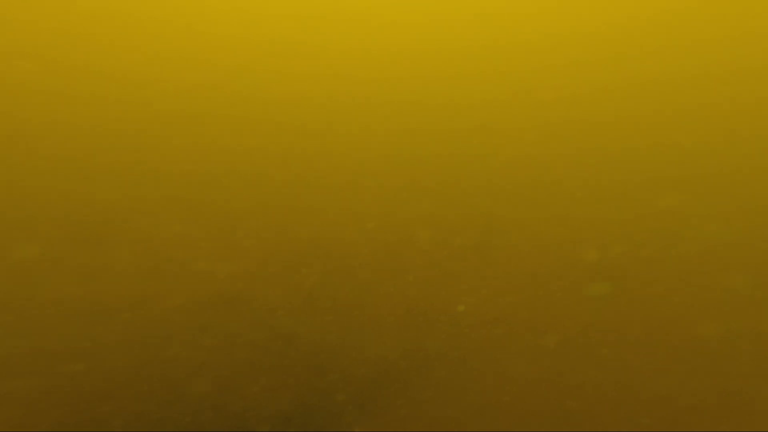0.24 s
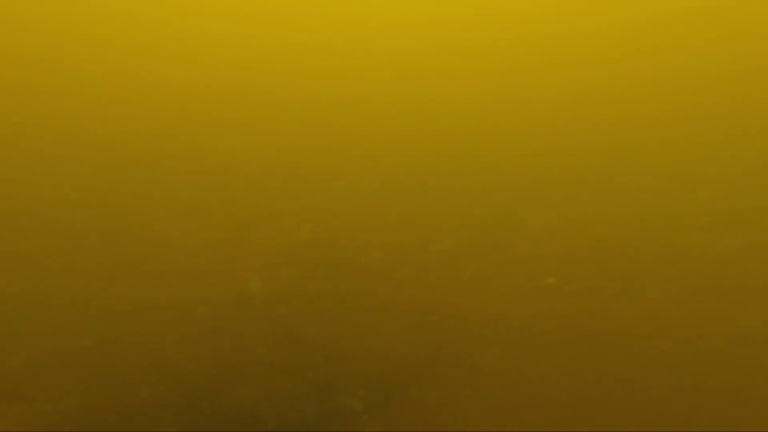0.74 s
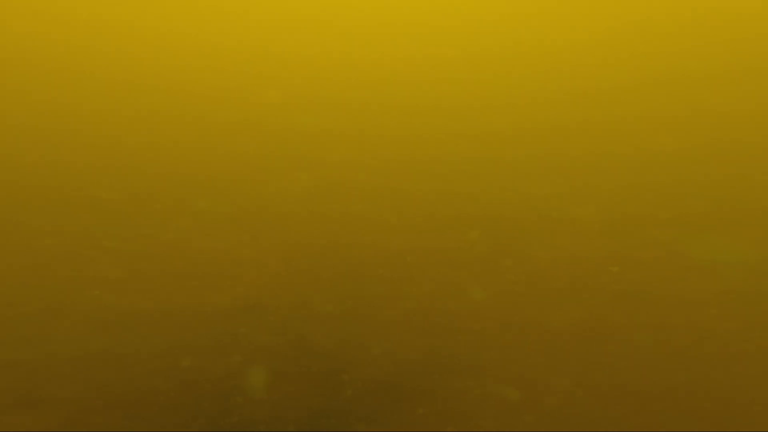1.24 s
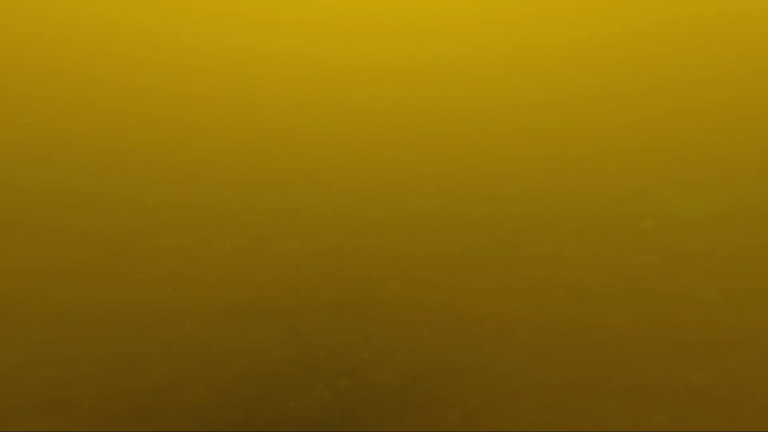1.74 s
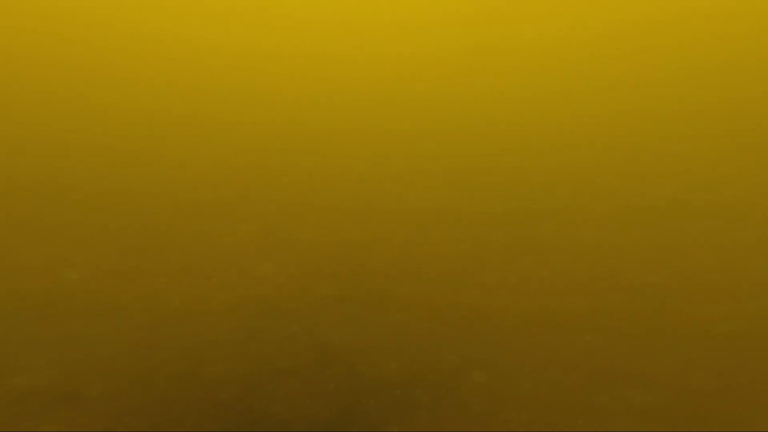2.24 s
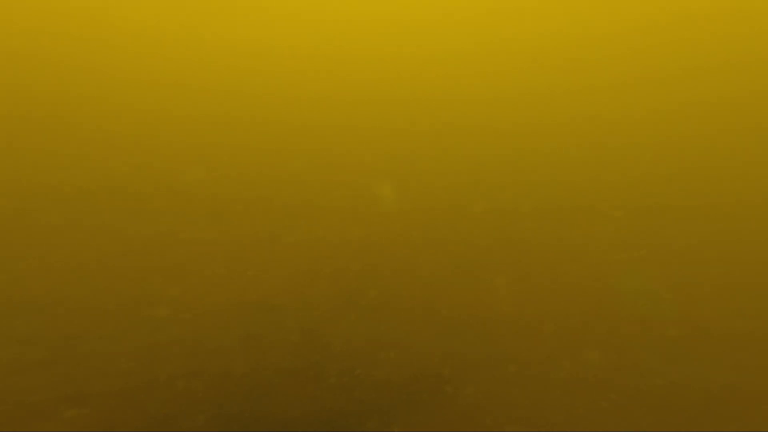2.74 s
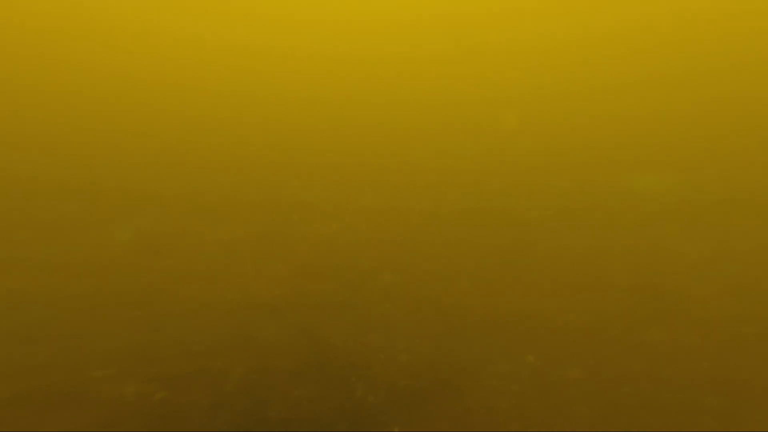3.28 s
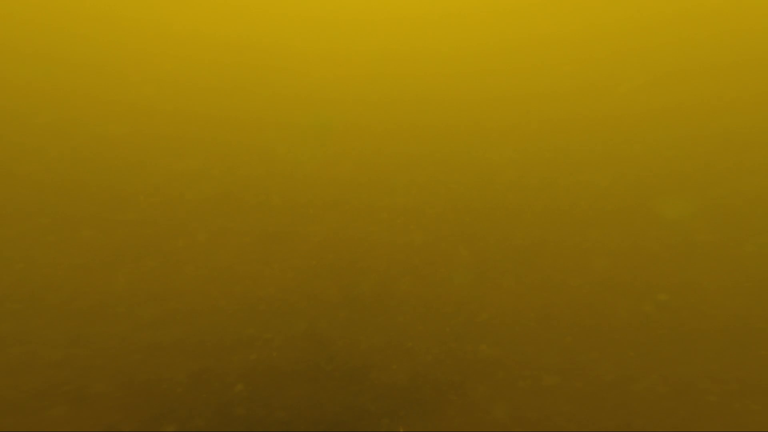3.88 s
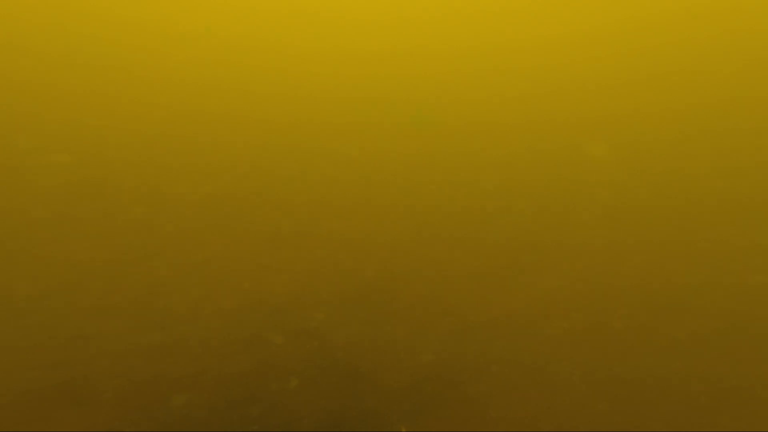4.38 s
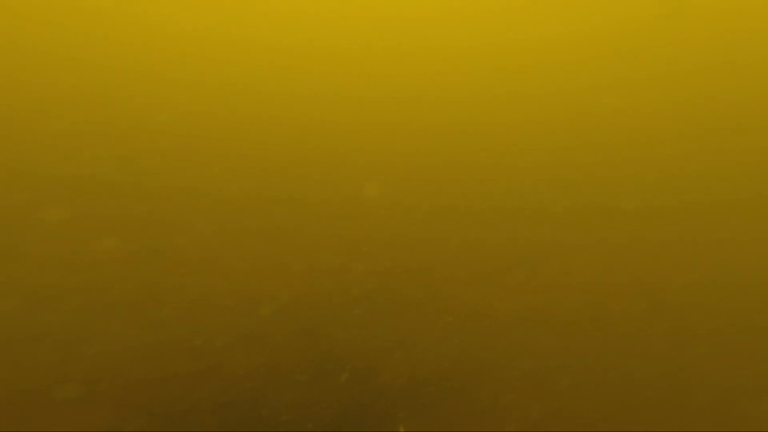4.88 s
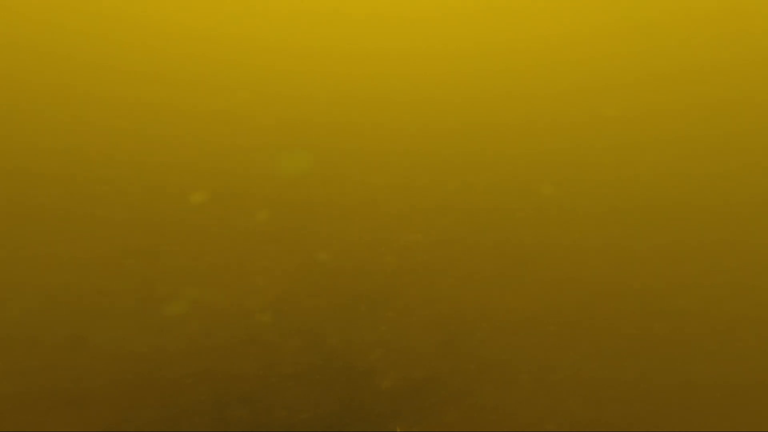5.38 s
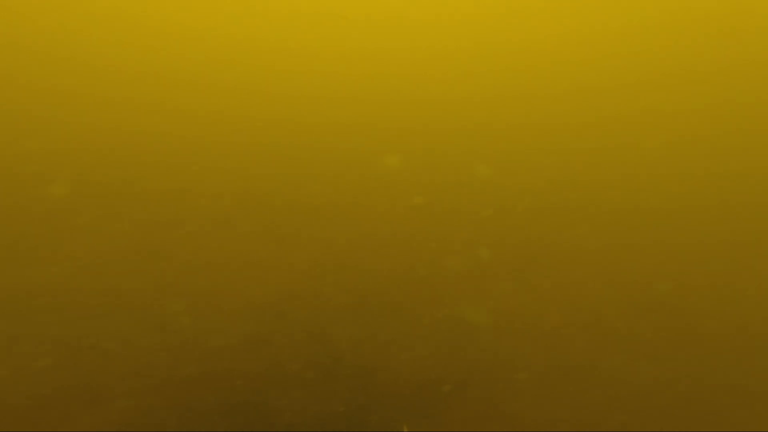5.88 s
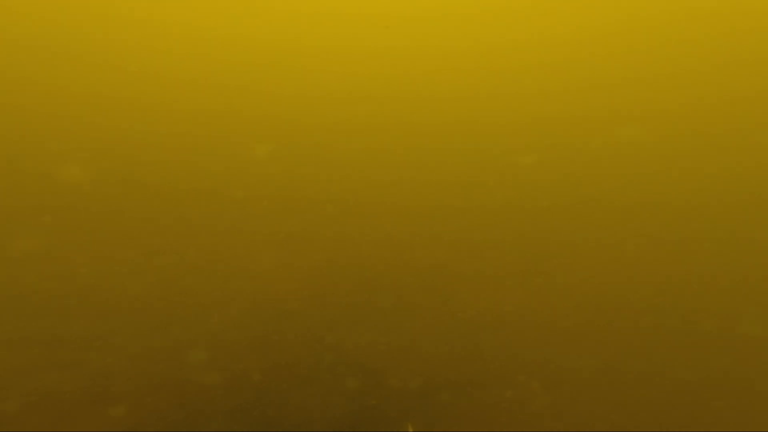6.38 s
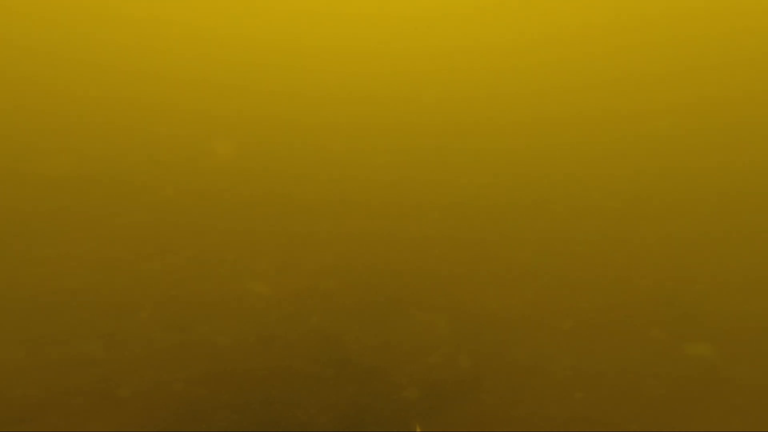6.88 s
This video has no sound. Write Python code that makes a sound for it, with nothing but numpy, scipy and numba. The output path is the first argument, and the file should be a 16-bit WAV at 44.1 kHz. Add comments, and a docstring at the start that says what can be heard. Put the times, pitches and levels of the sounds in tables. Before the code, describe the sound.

Underwater in a murky river, a motorboat's crackling whine speeds up and draws nearer over low current rumble, gurgles and dull housing bumps.

```python
"""A motor boat whines and crackles under water, speeding up and coming closer over the rumble of a murky river.
Two microphones sit in a waterproof camera housing; each propeller blade sheds a burst of collapsing bubbles
that rings the housing as a whine. The current rumbles past and slow eddies gurgle close by.
The housing is bumped on its mount, scraped and once struck so sharply that the limiter ducks."""
import sys
import numpy as np
from scipy import signal
from scipy.fft import rfft, irfft
from scipy.io import wavfile
from scipy.ndimage import uniform_filter1d, minimum_filter1d, map_coordinates
from numba import njit

SR = 44100
rng = np.random.default_rng(int(sys.argv[2]) if len(sys.argv) > 2 else 0)


def unload_audio(sound):
    """Save the sound as a 16-bit wav file, at the path given as the first command line argument."""
    columns = np.transpose(np.atleast_2d(sound))
    # keep every value between -1 and 1, then stretch to whole-number steps
    steps = np.round(np.clip(columns, -1, 1) * 32767)
    wavfile.write(sys.argv[1], SR, steps.astype(np.int16))


N = 313992
TIME = np.arange(N) / SR  # s
FREQ = np.maximum(np.arange(N // 2 + 1) * SR / N, .01)  # Hz, kept above 0 for the logarithm

# Propeller blade passes: [t/s, f/Hz]
BLADE_RATE = [(0, 33.2), (3.8, 33.39), (4.3, 42.2), (4.9, 44.37), (6.0, 44.44), (7.1, 43.82)]
# Strength of the cavitation as it reaches the camera: [t/s, level/dB]
CAVITATION_LEVEL = [(0, -1.44), (2.2, -0.1), (2.55, -4), (3.85, -2.5), (4.3, 2), (4.95, -0.5), (5.9, 3.5),
                    (7.1, 7.5)]
# Throttle: [t/s, load 0-1]
THROTTLE = [(0, 0), (3.8, 0.33), (4.3, 0.6), (5.4, 0.7), (5.9, 0.91), (7.1, 0.99)]
# Ringing of the bubble cloud behind the propeller: [t/s, lower resonance f/Hz, upper resonance f/Hz]
CLOUD_RESONANCES = [(4.2, 3700, 5980), (5.7, 3560, 5700), (6.5, 3330, 5720), (7.1, 3220, 5430)]
# Brief swells of the whine: [t/s, rise level/dB, half length to 1/e t/s]
WHINE_SWELLS = [(4.47, 2.5, 0.19), (5.85, 3.5, 0.12), (6.7, 4.5, 0.088)]
# Extra travel time of the reflection from the water surface: [t/s, delay t/s]
SURFACE_DELAY = [(0, 0.005195), (4.6, 0.0046), (5.6, 0.00304), (7.1, 0.0023)]
# Housing modes: [f/Hz, width f/Hz, signed gain at the left microphone, at the right microphone]
HOUSING_MODES = [(880, 65, 0.0077, 0.6052), (1118, 91, 0.072, 0.5), (1340, 3640, -0.052, -0.024),
                 (1592.6, 356.3, 1.086, 3), (1591, 95.2, -0.66, -4), (1757.3, 261, -0.38, -2),
                 (2019, 153, -0.26, -0.41), (2138, 98, -0.33, -0.45), (2270, 42, -0.16, 0.34),
                 (2400, 120, -0.2, 0.13), (2920, 130, -0.194, 0.1569), (3194, 158, 0.5, 0.0455),
                 (4022, 347, 0.299, -0.13), (4380, 1410, -0.17, -0.0344), (4905, 313.0, 0.36, 0.0963),
                 (5440, 500, 0.099, 0), (5910, 810, 0.047, -0.0), (6290, 1300, 0.047, -0.0),
                 (7013, 330, -0.164, 0.03), (8970, 450, -0.12, 0.0354)]
# Modes of the camera on its mount: [f/Hz, time to fall 60 dB t/s, level/dB]
MOUNT_MODES = [(105, 0.073, -2.5), (162, 0.049, 0), (217, 0.067, -9), (278, 0.027, -8.5), (330, 0.027, -9),
               (470, 0.02, -4)]
# Single bumps, peaks before the wall colours them: [t/s, peak level/dB, hardness of the contact f/Hz]
SINGLE_BUMPS = [(.25, -37, 257), (.485, -31, 121), (0.761, -15.5, 151), (1.49, -31.5, 81.3),
                (4.578, -7.5, 216), (4.604, -7, 185), (4.705, -22, 90), (5.292, -16.5, 155.5),
                (5.472, -15, 155), (6.182, -30, 110), (6.35, -34.5, 220.3), (6.507, -12.5, 147)]
# Double thuds, the mount pulled over and falling back; levels before wall and pan:
# [t/s, time to the second thud t/s, peak level/dB, hardness of the contact f/Hz, swing level/dB]
DOUBLE_THUDS = [(1.18, 0.13, -24.5, 83, -26), (1.746, .099, -34.5, 115, -35), (2.061, .112, -23.5, 88, -35),
                (2.306, 0.12, -12, 100.4, -14), (3.473, 0.12, -31.5, 125, -26),
                (4.03, 0.13, -24, 105, -22.5), (4.353, .127, -24, 113, -29), (4.963, 0.13, -15, 89, -15),
                (5.868, 0.13, -20, 69.4, -34)]
# Eddies rock the whole camera, levels before the pan: [t/s, peak level/dB, swing rate f/Hz]
EDDY_SWAYS = [(1.263, -18, 27.1), (1.49, -26, 42.7), (3.131, -17, 28), (3.97, -23.5, 30)]
# Grit striking the housing, levels before the pan: [t/s, peak level/dB, pitch f/Hz]
GRIT_TICKS = [(.236, -38, 700), (4.235, -32, 680), (4.333, -43, 525), (4.478, -27, 1150), (4.573, -24, 800),
              (4.658, -19, 1410), (4.685, -22, 1490), (4.76, -28.5, 1700)]
# Bubbles ringing close to the housing, levels before the pan: [t/s, peak level/dB, pitch f/Hz]
NEAR_BUBBLES = [(1.105, -30.5, 2250), (1.11, -39, 2540), (1.113, -43, 3400), (4.591, -20.5, 1110),
                (6.02, -44, 602)]
# What the sharp strike rings, levels before the pan: [delay t/s, peak level/dB, pitch f/Hz, decay t/s]
STRIKE_RINGS = [(0, -14.5, 424, 0.0007), (.0013, 8.5, 1177, 0.00057), (.0015, -1.5, 1150, 0.0013)]
# The housing drags over something rough; slips vary around their rate, the level is trimmed and wavers:
# [t/s, level/dB, slip rate f/Hz]
SCRAPE_COURSE = [(4.565, -75, 260.4), (4.578, -26, 260.2), (4.61, -26.5, 229.7), (4.655, -26, 209.7),
                 (4.69, -31, 184.7), (4.72, -36, 158.6), (4.75, -80, 152)]
# Outline of the scrape's spectrum, relative: [f/Hz, level per Hz/dB]
SCRAPE_OUTLINE = [(80, -19), (190, 4), (430, -1.5), (650, -15.5), (1100, -12), (1600, -9.5), (2200, -25.5),
                  (3000, -28), (3800, -49), (9000, -81)]
# Outline of the current's rumble, relative: [f/Hz, level per Hz/dB]
RUMBLE_OUTLINE = [(8, -16), (18, -1.5), (29, 1.5), (45, -5.5), (65, -13.5), (90, -23), (200, -38),
                  (500, -72.5), (2000, -115)]

# the crackle follows the cavitation strength fully, the whine by a share of it and by the load
CRACKLE_DB, WHINE_DB, WHINE_SHARE, WHINE_LOAD_DB, WHINE_WAVER_DB = -48, -40.5, 0.6, 3.5, 0.78
# crackle scattered by the river bed: gain before its filters, left minus right
SCATTER_DB, SCATTER_PAN_DB = -37.5, -5.5
# dip just above the cloud's lower resonance: ratio to that resonance, width, depth 0-1 at full load
CLOUD_GAP_RATIO, CLOUD_GAP_HZ, CLOUD_GAP_DEPTH = 1.132, 520.0, 0.7
# each thud of a pair starts with a lighter touch and then swings the camera
TOUCH_LEAD_S, TOUCH_DB, SWING_HZ, SWING_LAG_S = 0.01577, -9.5, 60.3, 0.0041
# decay time constants in cycles of the pitch, and place as left minus right
TICK_CYCLES, BUBBLE_CYCLES, TICK_PAN_DB, BUBBLE_PAN_DB = 0.45, 2.9, -11, -9
STRIKE_S, STRIKE_PAN_DB = 4.0823, -9.5
# rumble that wanders, and slosh that rises with the load
RUMBLE_DB, RUMBLE_WANDER_DB, SLOSH_DB, SLOSH_LOAD_DB = -31.7, 2.5, -51.5, 2.5
# water stirred by a knock: level for a 0 dB knock, share of the knock's dB, half length to 1/e
STIR_DB, STIR_SHARE, STIR_S = -37, 0.29, 0.074
TRICKLE_RING_HZ, TRICKLE_WIDTH_HZ, TRICKLE_RING_DB = 330.5, 53.0, 2.5
TOP_HZ = 12000


def propeller(blade_hz):
    """Cavitation: separate bursts at low speed merge into a rush under load, heard through the housing."""
    strength_db, = curves(CAVITATION_LEVEL)
    load, = curves(THROTTLE)
    swell_db = sum(db * hump(s, half_s) for s, db, half_s in WHINE_SWELLS)
    swell_db = swell_db + WHINE_WAVER_DB * walk(8)
    whine_db = WHINE_DB + WHINE_SHARE * strength_db + WHINE_LOAD_DB * load + swell_db
    bursts = collapses(blade_hz, jitter_s=.0007, spread_db=2.5, stray_rate=150, stray_db=-4.0, decay_s=0.0021)

    # big bubbles ring on between the blades, small ones only crackle as they collapse
    big = rng.standard_normal(N) * np.sqrt(bursts + undb(6.5 - 3 * load))
    small = rng.standard_normal(N) * np.sqrt(bursts + undb(-10.5 + 11 * load))
    small = bubble_cloud(small, load)

    # the loaded drive whines in two bands, the upper one wavering
    low_band = resonate(big, np.full(N, 860.), 200.)
    high_band = resonate(big, 1490 + 35 * walk(6.7), 90.)
    big = big + load * (undb(2.5) * low_band + undb(-1.0) * high_band)
    big = cut(cut(big, 774, "high", order=7), 2500, "low", order=6)
    whine = steady(housing(surface(big, gain=0.093)))

    small = cut(cut(small, 2430, "high", order=4), 7350, "low", order=13)
    # unrelated at the two microphones
    scattered = rng.standard_normal((2, N)) * np.sqrt(bursts + undb(-13.5 + 13 * load))
    scattered = cut(cut(scattered, 4500, "high", order=4), 6400, "low", order=8)
    scattered = pan(scattered, SCATTER_PAN_DB) * undb(SCATTER_DB)
    # a little of the crackle passes straight through the wall
    through_wall = np.outer([.012, .012], small)
    crackle = steady(housing(small) + through_wall + scattered)
    return whine * undb(whine_db) + crackle * undb(CRACKLE_DB + strength_db)


def collapses(blade_hz, jitter_s, spread_db, stray_rate, stray_db, decay_s):
    """Power envelope of the bubble bursts, mean 1: one per blade, uneven, and strays in between."""
    starts = np.flatnonzero(np.diff(np.floor(np.cumsum(blade_hz) / SR)))
    chance = rng.standard_normal((400, 2))[:len(starts)]
    strays = rng.random(N) < stray_rate / SR
    power = strays * undb(stray_db + spread_db * np.clip(rng.standard_normal(N), -2, 2)) ** 2
    at = np.clip(starts + (jitter_s * SR * chance[:, 0]).astype(int), 0, N - 1)
    power[at] += undb(spread_db * np.clip(chance[:, 1], -2, 2)) ** 2
    # echoes between bed and surface draw each burst out
    power = signal.lfilter([1], [1, -np.exp(-1 / (decay_s * SR))], power)
    return power / power.mean()


def bubble_cloud(x, load):
    """The cloud grows under load: it swallows a band near the top and rings at two sinking resonances."""
    lower_hz, upper_hz = curves(CLOUD_RESONANCES)
    x = x - load * resonate(x, np.full(N, 6900.), 800.)
    lower_ring = undb(5.0) * resonate(x, lower_hz, 250.0)
    upper_ring = undb(7.5) * resonate(x, upper_hz, 400.0)
    x = x + load * (lower_ring + upper_ring)
    return x - CLOUD_GAP_DEPTH * load * resonate(x, CLOUD_GAP_RATIO * lower_hz, CLOUD_GAP_HZ)


def surface(x, gain):
    """The surface mirrors the sound upside down; the comb rises as the delay shrinks."""
    delay_s, = curves(SURFACE_DELAY)
    return x - gain * map_coordinates(x, [(TIME - delay_s) * SR], order=3)


def housing(x):
    """Every mode of the shell reaches the two microphones with its own strength and sign."""
    out = np.zeros((2, N))
    for hz, width, left, right in HOUSING_MODES:
        mode = signal.lfilter(*signal.iirpeak(hz, hz / width, fs=SR), x)
        out += np.outer([left, right], mode)
    return out


def bumps():
    """Soft pushes ring the mount; a harder contact reaches its higher modes."""
    t = TIME[:SR // 4]
    ring = sum(undb(db) * np.cos(2 * np.pi * hz * t) * np.exp(-np.log(1000) * t / t60)
               for hz, t60, db in MOUNT_MODES)
    out, lead = np.zeros(N), .05  # lead in s leaves room for the push to build
    pulls = [(s, db, hz) for s, db, hz, _ in thuds()]
    touches = [(s - TOUCH_LEAD_S, db + TOUCH_DB, hz) for s, db, hz in pulls]
    for s, db, hz in list(SINGLE_BUMPS) + pulls + touches:
        u = (np.pi * hz * (t - lead)) ** 2
        push = (1 - 2 * u) * np.exp(-u)
        # the mount has play: it catches a second time just after the first touch
        push = push + 0.74 * np.interp(t - min(.0068, 1.12 / hz), t, push)
        hit = signal.fftconvolve(push, ring)[:len(t)]
        add(out, s - lead, hit / np.abs(hit).max() * undb(db))
    return wall(out)


def thuds():
    """Both thuds of every pair: (s, peak dB, hardness Hz, swing dB)."""
    return [(at, db, hz, swing_db)
            for s, gap_s, db, hz, swing_db in DOUBLE_THUDS for at in (s, s + gap_s)]


def sways():
    """An eddy or a tug swings the camera through a cycle or two against the water."""
    out, t = np.zeros(N), TIME[:SR // 4]
    swings = [(s + SWING_LAG_S, swing_db, SWING_HZ) for s, _, _, swing_db in thuds()]
    for s, db, hz in list(EDDY_SWAYS) + swings:
        cycles = hz * (t - t.mean())
        swing = np.cos(2 * np.pi * cycles) * np.exp(-((cycles - .2) / 1.18) ** 2)
        add(out, s - t.mean(), undb(db) * swing)
    return pan(out, -4.5)


def ticks():
    """Grit, nearby bubbles and the sharp strike; lower grit and bubble pitches ring for longer."""
    out = np.zeros((2, N))
    for s, db, hz in GRIT_TICKS:
        add(out, s, pan(ping(db, hz, TICK_CYCLES / hz), TICK_PAN_DB))
    for s, db, hz in NEAR_BUBBLES:
        add(out, s, pan(ping(db, hz, BUBBLE_CYCLES / hz), BUBBLE_PAN_DB))
    for delay_s, db, hz, decay_s in STRIKE_RINGS:
        add(out, STRIKE_S + delay_s, pan(ping(db, hz, decay_s), STRIKE_PAN_DB))
    return out


def ping(db, hz, decay_s):
    """A short ring that rides on a dent of the wall."""
    t = TIME[:SR // 8]
    envelope = (t / decay_s) ** 2 * np.exp(-t / decay_s)
    ring = envelope * (np.sin(2 * np.pi * hz * t) + 0.3)
    return ring / np.abs(ring).max() * undb(db)


def scrape():
    """Uneven stick-slip pulses with a gritty noise between them."""
    db, slip_hz = curves(SCRAPE_COURSE)
    phase = np.cumsum(slip_hz * np.exp(.25 * walk(200))) / SR
    slips = np.diff(np.floor(phase), prepend=0) * undb(3.3 * walk(250))
    rough = colour(unit(slips) + .8 * rng.standard_normal(N), SCRAPE_OUTLINE)
    return wall(rough * undb(db - 1.5 + 2.5 * walk(110)))


def current(blade_hz):
    """Water buffets the housing; the loaded propeller adds a deep throb at its blade rate."""
    load, = curves(THROTTLE)
    churn = np.sqrt(undb(SLOSH_DB + SLOSH_LOAD_DB * load) ** 2 + stir())
    rumble = colour(rng.standard_normal(N), RUMBLE_OUTLINE) * undb(RUMBLE_DB + RUMBLE_WANDER_DB * walk(7))
    slosh = gurgles(rate=70, pitch_hz=134.5, spread_db=5, tilt_db=-10) * churn
    trickle = gurgles(rate=90, pitch_hz=301.4, spread_db=6.5, tilt_db=-12.5) * churn * undb(-16)
    # the trickle rings the mount
    mount_ring = resonate(trickle, np.full(N, TRICKLE_RING_HZ), TRICKLE_WIDTH_HZ)
    trickle = trickle + undb(TRICKLE_RING_DB) * mount_ring
    throb = np.sin(2 * np.pi * np.cumsum(blade_hz) / SR) * undb(-45.5 + 13.8 * load + 2 * walk(4.6))
    return wall(rumble + throb + slosh + trickle)


def gurgles(rate, pitch_hz, spread_db, tilt_db):
    """Eddies and air pockets wobble for a cycle or two, gliding a little; higher ones are weaker."""
    out, t = np.zeros(N), TIME[:SR // 10]
    t = t - t.mean()
    starts = np.cumsum(rng.exponential(1 / rate, size=900))
    for s, (pitch, size, glide, turn) in zip(starts, rng.standard_normal((900, 4))):
        if s < TIME[-1]:
            octaves = np.clip(.7 * pitch, -1.1, 1.9)
            cycles = pitch_hz * 2 ** octaves * t
            wobble = np.sin(2 * np.pi * cycles * (1 + 0.087 * glide * cycles) + np.pi * turn)
            wobble = wobble * np.exp(-(cycles / 1.2) ** 2)
            level_db = spread_db * np.clip(size, -2, 2) + tilt_db * max(octaves, 0)
            add(out, s, wobble * undb(level_db))
    return unit(out)


def stir():
    """Power of the water stirred up around each knock."""
    return sum(undb(STIR_DB + STIR_SHARE * db) ** 2 * hump(s, STIR_S)
               for s, db, *_ in thuds() + list(SINGLE_BUMPS))


def wall(x):
    """Low sounds bend the whole wall: the right microphone feels them more, and more so as the pitch rises."""
    return pan(x, -4.5) + np.outer([-.2, .9], cut(x, 480, "high", order=1))


@njit
def resonate(x, hz, width):
    """State-variable band-pass with a moving centre, gain 1 there; width in Hz."""
    y, band, low = np.empty(len(x)), 0., 0.
    for i in range(len(x)):
        g, damping = np.tan(np.pi * hz[i] / SR), width / hz[i]
        v = (band + g * (x[i] - low)) / (1 + g * (g + damping))
        band, low, y[i] = 2 * v - band, low + 2 * g * v, damping * v
    return y


def steady(x):
    """Hold the slow level at rms 1 and keep the quick flutter."""
    return x / np.sqrt(uniform_filter1d(np.mean(x ** 2, axis=0), size=15000))


def colour(x, points):
    """Causal minimum-phase filter with the given (Hz, dB) outline; rms 1."""
    hz, db = np.transpose(points)
    outline = undb(np.interp(np.log(FREQ), np.log(hz), db))
    cepstrum = irfft(np.log(outline), N)
    # fold the cepstrum onto positive times
    cepstrum[1:N // 2] *= 2
    cepstrum[N // 2 + 1:] = 0
    return unit(irfft(rfft(x) * np.exp(rfft(cepstrum)), N))


def cut(x, hz, kind, order):
    """Butterworth low-pass or high-pass."""
    return signal.sosfilt(signal.butter(order, hz, kind, fs=SR, output="sos"), x)


def pan(x, db):
    """Place a sound by its left minus right level."""
    return undb([[db / 2], [-db / 2]]) * x


def walk(rate):
    """Random levels held 1 / rate s and slewed twice; spread near 1."""
    k = int(SR / rate)
    held = rng.standard_normal(4096)[np.arange(N) // k]
    return 1.3 * uniform_filter1d(uniform_filter1d(held, k), k)


def hump(s, half_s):
    """A smooth rise and fall around time s, 1 at the top."""
    return np.exp(-np.minimum(((TIME - s) / half_s) ** 2, 50))


def curves(table):
    """Each column of a table of times, joined by straight lines."""
    s, *columns = np.transpose(table)
    return [np.interp(TIME, s, c) for c in columns]


def add(out, s, x):
    """Mix x in at time s."""
    i = int(s * SR)
    out[..., i:i + x.shape[-1]] += x[..., :N - i]


def undb(db):
    """Decibels to gain."""
    return 10 ** (np.asarray(db) / 20)


def unit(x):
    """Scale to rms 1."""
    return x / np.sqrt(np.mean(x ** 2))


def scene():
    """Boat, knocks and river at the two microphones."""
    blade_hz, = curves(BLADE_RATE)
    return propeller(blade_hz) + bumps() + sways() + ticks() + scrape() + current(blade_hz)


def limiter(x, ceiling, hold_s, release_s):
    """Looks a little ahead, drops the gain quickly on an overload, holds it and lets it back slowly."""
    peak = -minimum_filter1d(-np.abs(x).max(axis=0), size=180)
    over = np.log(np.maximum(peak / ceiling, 1)) + 1e-12
    half = int(hold_s * SR / 2)
    over = -minimum_filter1d(-over, 2 * half + 1, origin=half)
    # a running maximum along a sloping line gives the exponential release
    held = np.exp(np.maximum.accumulate(np.log(over) + TIME / release_s) - TIME / release_s)
    return x * np.exp(-uniform_filter1d(held, size=90))


def record(dry):
    """The camera limits the peaks, clips what slips through and cuts the top."""
    limited = limiter(dry, ceiling=0.98, hold_s=0.038, release_s=0.045)
    clipped = np.clip(limited, -.93, .93)
    return signal.sosfilt(signal.ellip(8, .2, 70, TOP_HZ, fs=SR, output="sos"), clipped)


dry = scene()
out = record(dry)
unload_audio(out)
```